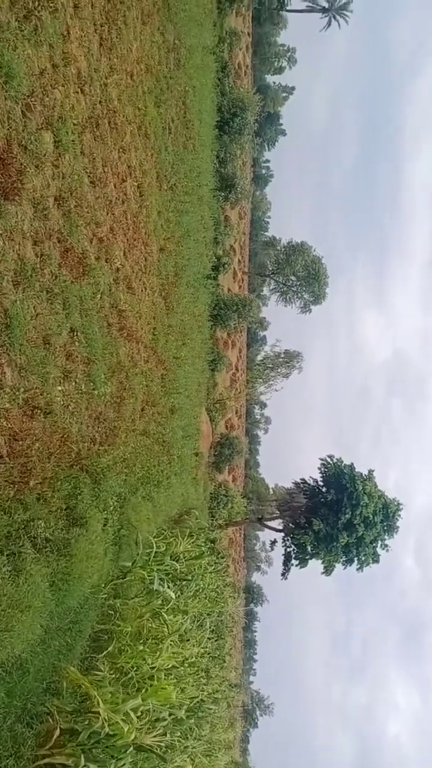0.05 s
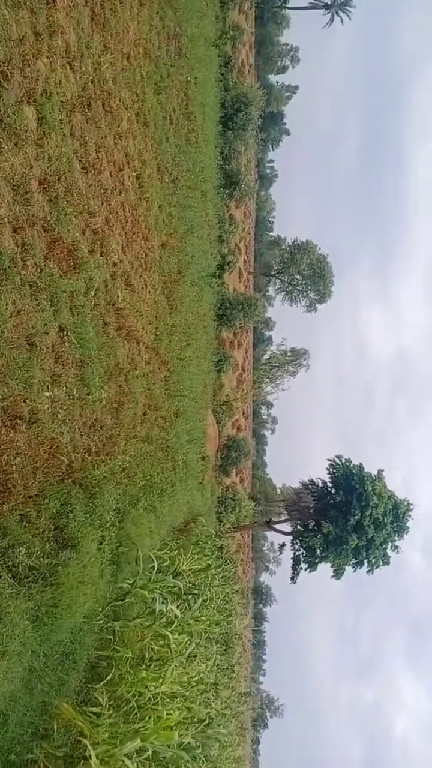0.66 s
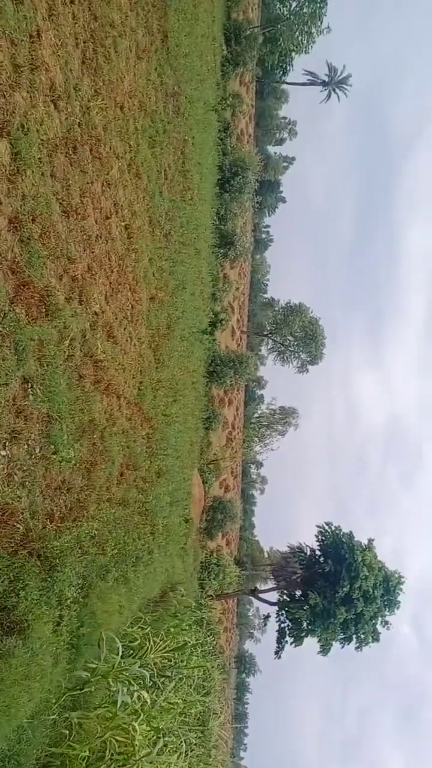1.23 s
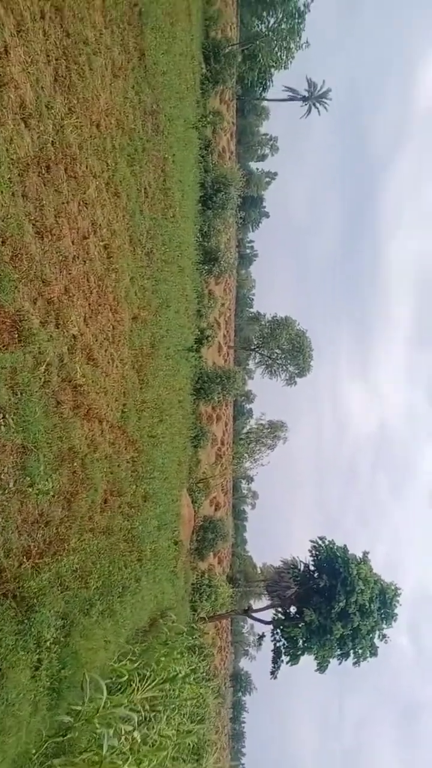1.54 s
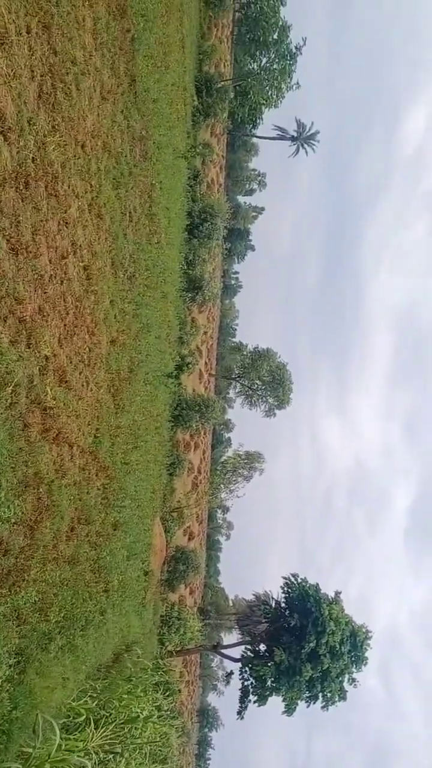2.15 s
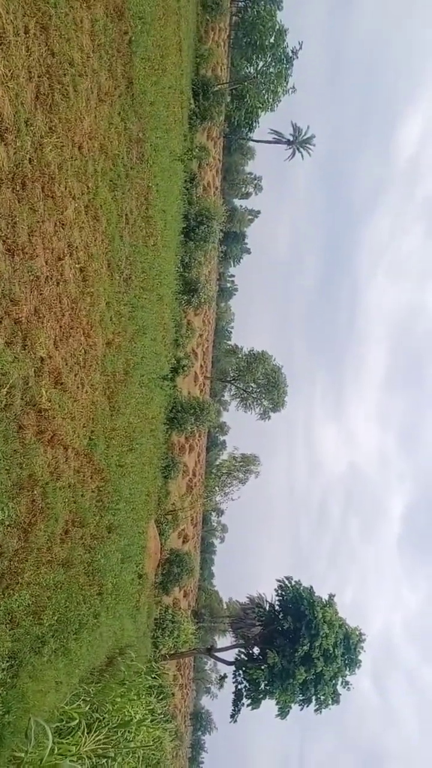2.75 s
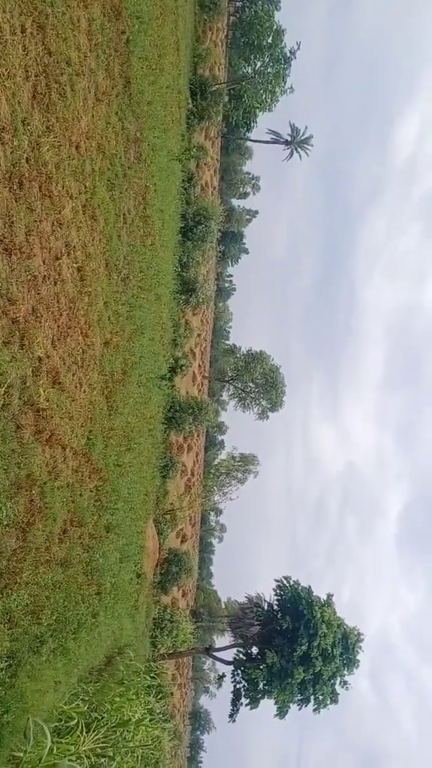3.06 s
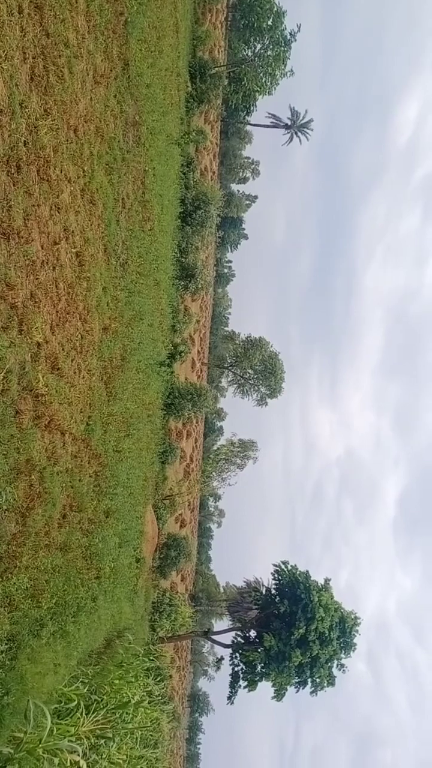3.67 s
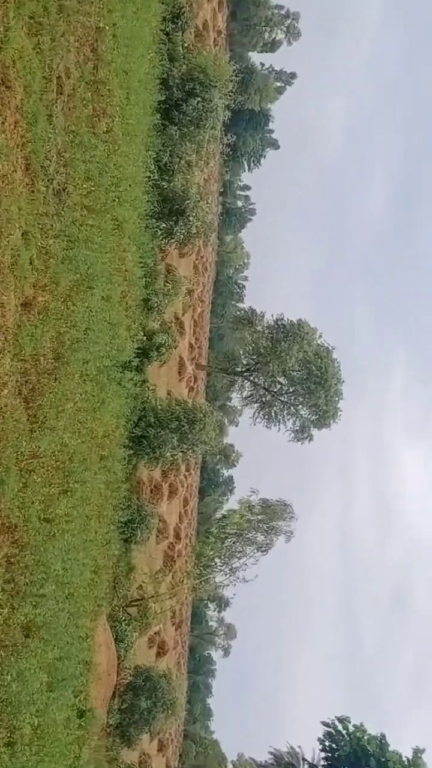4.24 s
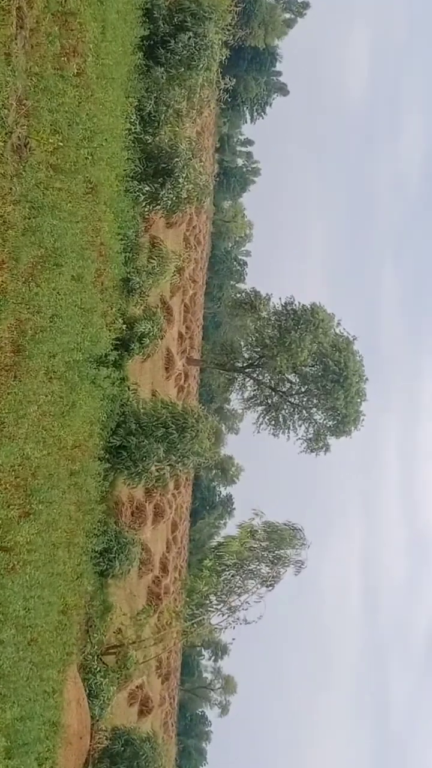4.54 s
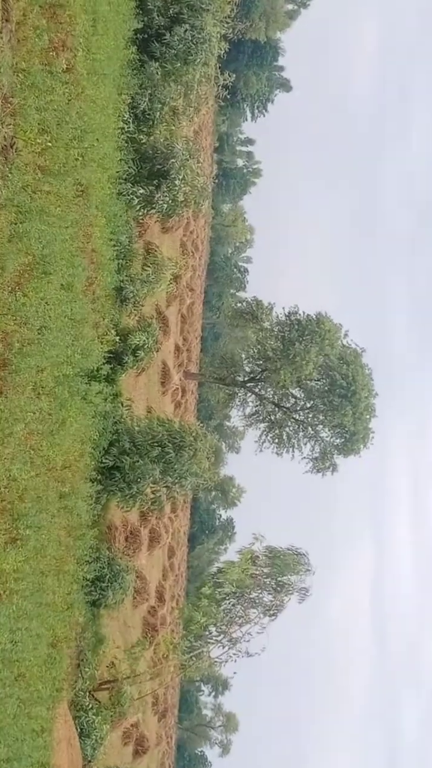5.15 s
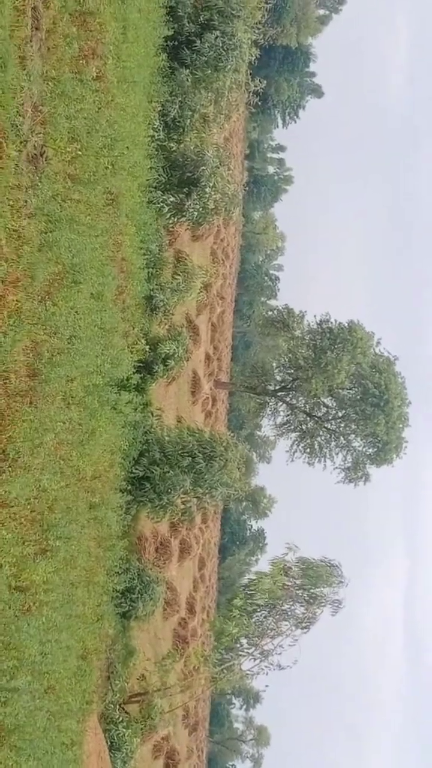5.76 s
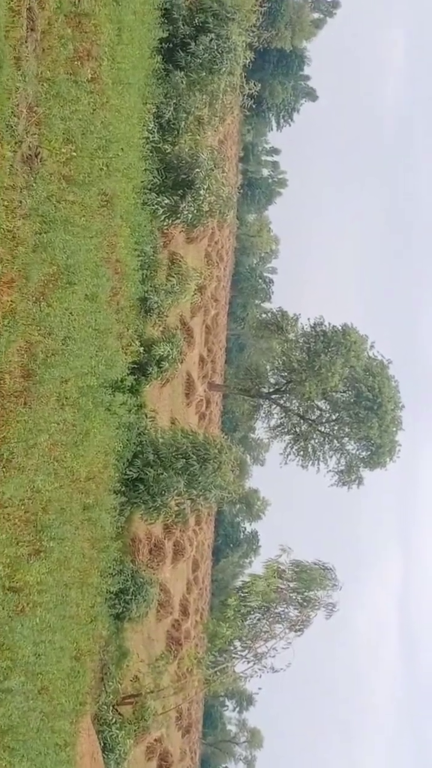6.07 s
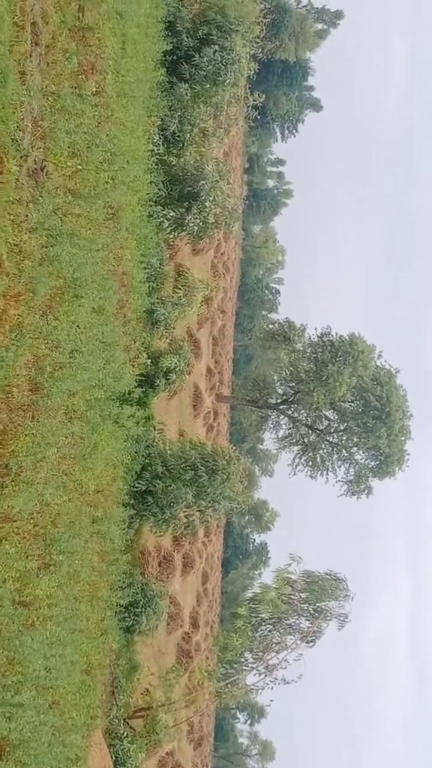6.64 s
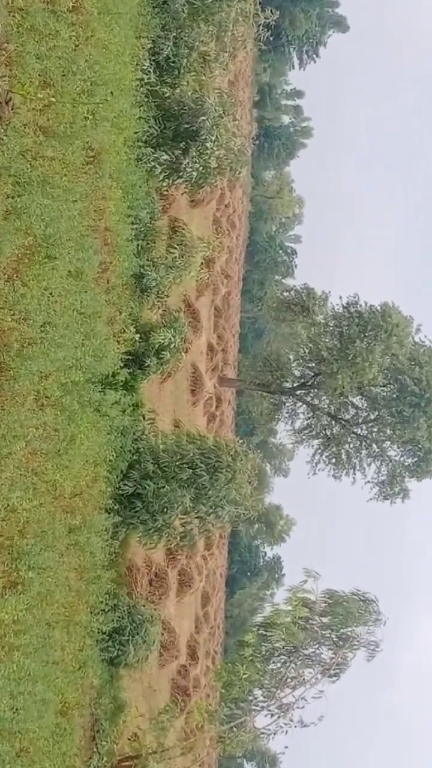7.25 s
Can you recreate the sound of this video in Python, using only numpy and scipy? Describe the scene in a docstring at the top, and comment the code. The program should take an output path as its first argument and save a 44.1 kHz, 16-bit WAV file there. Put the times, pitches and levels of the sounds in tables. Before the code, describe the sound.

Leaves brush past, then a far bird repeats a wavy whistle as songbirds grow louder over hissing field insects.

```python
"""Birds and insects on open farmland

A far bird repeats a wavy whistle, songbirds break into slides and buzzy chirps, and a dove coos.
Crickets and a katydid scrape their wings in a steady high hiss. Crop leaves brush past at first,
and puffs of wind thump on the microphone. The ground and the tree line scatter the calls."""
import sys
import numpy as np
from scipy import signal
from scipy.fft import rfft, irfft
from scipy.io import wavfile
from scipy.ndimage import uniform_filter1d, map_coordinates

SR = 44100
rng = np.random.default_rng(int(sys.argv[2]) if len(sys.argv) > 2 else 0)


def digitize_waveform(pressure):
    """Quantize a signal to 16-bit integers and store it at the path in sys.argv[1].

    Rows of a 2-D input are taken as channels; values are limited to [-1, 1].
    """
    field = np.atleast_2d(pressure).T
    bounded = np.clip(field, -1, 1)
    quanta = np.round(bounded * 32767).astype(np.int16)
    wavfile.write(sys.argv[1], SR, quanta)


N = 326340

EDGE_S, EDGE_SHARE = 0.002, 0.13  # a songbird's note fades over a fixed time plus a share of its length
BUZZ_SWING_HZ = 653  # how far the pitch swings each way in the harshest buzz


def undb(db):
    """Turn decibels into a gain to multiply by."""
    return 10 ** (np.asarray(db) / 20)


def unit(x):
    """Scale a signal so that its average strength (rms) is 1."""
    return x / np.sqrt(np.mean(x ** 2) + 1e-20)


def colour(x, points, tilt_db=0):
    """Shape the tone by (Hz, dB) points and a tilt per octave; the result has strength 1."""
    hz, db = np.transpose(points)
    octave = np.log2(np.maximum(np.fft.rfftfreq(len(x), 1 / SR), 1))
    curve_db = np.interp(octave, np.log2(hz), db) + tilt_db * octave
    return unit(irfft(rfft(x) * undb(curve_db), len(x)))


def noise(points):
    """Noise for the whole scene, shaped by (Hz, dB) points."""
    return colour(rng.standard_normal(N), points)


def walk(rate, size=N):
    """A smooth random drift, roughly between -1 and 1, with `rate` new values a second."""
    at = np.arange(size) * rate / SR
    return map_coordinates(rng.standard_normal(int(at[-1]) + 4), [at + 1], order=2, mode="nearest")


def pan(x, left_db):
    """Make stereo, with the left side louder than the right by left_db."""
    return x * undb(np.array([[left_db], [-left_db]]) / 2)


def widen(x):
    """Give a sound opposite signs left and right, which adds width to a mix."""
    return x * np.array([[1], [-1]])


def add(track, s, x):
    """Mix a sound into a track, starting at s seconds."""
    i = int(s * SR)
    x, i = x[max(-i, 0):], max(i, 0)
    track[i:i + len(x)] += x[:max(N - i, 0)]


def envelope(length, db, swell_db=0, edge=0.0053):
    """Return u, the progress through a note from 0 to 1, and a gain with fades of `edge` seconds."""
    u = np.linspace(0, 1, max(int(length * SR), 16))
    fade = np.minimum(np.minimum(u, 1 - u) * length / min(edge, length / 2), 1)
    return u, np.sin(np.pi / 2 * fade) ** 2 * undb(db + swell_db * (u - .5))


def tone(hz, overtone_db, jitter):
    """A nearly pure tone with two faint overtones; jitter is the share by which its pitch wavers."""
    phase = 2 * np.pi * np.cumsum(hz * (1 + jitter * walk(350, size=len(hz)))) / SR
    return np.sqrt(2) * sum(undb(overtone_db * np.sqrt(k - 1)) * (k * hz < SR / 2) * np.sin(k * phase)
                            for k in (1, 2, 3))


def scatter(x, db, t60, delay):
    """A shower of small echoes that starts after `delay` seconds and dies by 60 dB in t60 seconds."""
    t = np.arange(SR) / SR
    tail = unit(rng.standard_normal(SR) * np.exp(-np.log(1000) * t / t60) * (t > delay)) / np.sqrt(SR)
    return undb(db) * signal.fftconvolve(x, tail)[:N]


def outdoors(x, left_db, near_db, far_db, near_t60, far_t60):
    """The direct sound, quick echoes from ground and crops, and a thin tail from the trees."""
    echo = lambda: scatter(x, near_db, near_t60, delay=0.002) + scatter(x, far_db, far_t60, delay=0.024)
    return pan(x + echo() + widen(0.2 * echo()), left_db)


def wing_scrapes(bursts, rate, sharpness, edge):
    """The gain of a wing scraping to and fro in bursts, `rate` times a second."""
    out = np.zeros(N)
    for s, length, db, swell_db in bursts:
        u, gain = envelope(length, db, swell_db, edge)
        phase = np.pi * rate * length * u + 0.066 * walk(27, size=len(u))
        add(out, s, gain * unit(np.abs(np.sin(phase)) ** sharpness + 0.19))
    return out


def insects():
    """Ringing cricket wings and a raspy katydid (a bush cricket) over the chorus of the whole field."""
    # Bursts of scraping. Each row: start and length in seconds, relative level in dB, swell in dB.
    cricket_bursts = [(-.02, 0.19, -52, 2.5), (.58, 0.1, -51, 4), (.683, 0.19, -43, 2),
                      (2.78, 0.22, -63.5, 9), (4.2, 0.22, -62.5, 2), (4.63, 0.13, -64, 12),
                      (4.95, 0.43, -61, 3), (5.72, 0.23, -59.5, 5), (6.42, 0.22, -57, -5.5),
                      (6.9, 0.24, -55, 4.5), (7.14, 0.25, -58, -4)]
    katydid_bursts = [(2.56, .28, -65, 12), (2.82, 1.42, -62.5, 3), (5.34, 0.206, -64, 8),
                      (5.54, 1.85, -59.5, 2)]
    # The tone of the chorus and of the katydid. Each row: frequency in Hz, relative level in dB.
    chorus_colour = [(5800, -47.5), (6250, -18.5), (6550, -1.5), (6850, 1), (7150, -4), (7500, -7),
                     (8050, -6), (8350, -30.5), (8700, -39)]
    katydid_colour = [(6800, -54.5), (7300, 2), (7700, 4), (8200, 9), (8380, 3.5), (8520, -73.5),
                      (8800, -33)]
    wing = tone(hz=np.full(N, 6950.), overtone_db=-53, jitter=.012)
    cricket = wing * wing_scrapes(cricket_bursts, rate=157, sharpness=5.2, edge=0.0031)
    rasp = 0.5 * wing_scrapes(katydid_bursts, rate=55.6, sharpness=1.6, edge=0.013)
    rasp += 0.21 * wing_scrapes(katydid_bursts, rate=74, sharpness=0.64, edge=0.026)
    pulsing = 1 + 0.2 * np.sin(2 * np.pi * np.cumsum(158 + 4 * walk(8)) / SR)
    chorus = noise(chorus_colour) * pulsing * undb(-62.5 + 0.94 * walk(3.7))
    width = widen(noise(chorus_colour) * undb(-77.5))
    katydid = rasp * noise(katydid_colour) * undb(-1)
    return pan(cricket, left_db=-3.5) + pan(katydid, left_db=-12.5) + pan(chorus, left_db=-4) + width


def brushing():
    """The gains of the rustle and of its crisp hiss as leaves brush past, stroke by stroke."""
    # Leaf strokes. Each row: start and length in seconds, relative levels of rustle and hiss in dB.
    strokes = [(-.02, 0.25, -58.5, -63.5), (0.223, 0.037, -54.5, -49), (0.236, 0.067, -61, -66),
               (0.288, .14, -57.5, -55.5), (0.412, 0.051, -53.5, -49.5), (0.453, 0.19, -59.5, -54.5),
               (0.602, 0.023, -57.5, -51), (0.627, 0.496, -61, -62.5), (1.111, 0.31, -58, -59.5),
               (1.41, 0.154, -63, -68), (1.547, 0.18, -79, -81), (1.711, 0.25, -72.5, -70),
               (1.927, .1, -82, -88)]
    rustle, crisp = np.zeros(N), np.zeros(N)
    for s, length, rustle_db, crisp_db in strokes:
        add(rustle, s, envelope(length, rustle_db, swell_db=-0.5, edge=0.015)[1])
        add(crisp, s, envelope(length, crisp_db, swell_db=-0.5, edge=0.015)[1])
    return rustle, crisp


def flexing(x, depth_db, rate):
    """Leaves bend as they slide, so each third of an octave swells and fades on its own."""
    spectrum = rfft(x)
    thirds = 3 * np.log2(np.maximum(np.fft.rfftfreq(N, 1 / SR), 1) / 250)
    bands = (irfft(spectrum * np.maximum(1 - abs(thirds - k), 0), N) for k in range(16))
    return unit(sum(band * undb(depth_db * walk(rate)) for band in bands))


def leaves():
    """Countless tiny slips of leaf on leaf, with a few snapping stalks."""
    # The tone of the rustle, its crisp hiss and a snap. Each row: frequency in Hz, relative level in dB.
    leaf_colour = [(180, -48), (300, -11), (527, -11.5), (686, -66), (871, -8.5), (1190, -10), (1380, -9.5),
                   (1780, -3), (2150, 2), (2830, -2.5), (6000, -3), (7800, -16), (13200, -120)]
    crisp_colour = [(4500, -29), (6000, 11.5), (8000, 11), (10000, -5.5), (12500, -4), (15000, 2.5),
                    (16000, 7)]
    snap_colour = [(40, -100), (500, -64), (900, -2.5), (2300, 18.5), (6000, 15), (15000, -53)]
    # Stalks snapping. Each row: start and length in seconds, level in dB, brightness in dB per octave.
    stalk_snaps = [(0.174, 0.0084, -47.5, -3), (0.234, 0.016, -38.5, -6.5), (0.29, 0.016, -49, -1),
                   (0.343, 0.0037, -37, 24), (0.546, 0.0033, -43, 19), (0.549, 0.012, -47.5, -12.5),
                   (0.589, 0.011, -48.5, -11.5), (0.698, 0.0036, -37, -8), (1.047, 0.0039, -46.5, 10),
                   (1.127, 0.026, -47.5, 25), (1.505, 0.018, -52.5, 10), (1.763, 0.0037, -48, 14),
                   (1.839, 0.0068, -55.5, -11.5)]
    rustle_gain, crisp_gain = brushing()
    slips = lambda: rng.standard_normal(N) * undb(1.86 * rng.exponential(size=N) + 1.4 * walk(140))
    rustle = flexing(colour(slips(), leaf_colour), depth_db=4.5, rate=13.72) * rustle_gain * undb(4.5)
    crisp = lambda: colour(slips(), crisp_colour) * crisp_gain * undb(3.5)
    snaps = np.zeros(N)
    for s, length, db, tilt_db in stalk_snaps:
        u, gain = envelope(length, db, edge=0.0017)
        crack = colour(rng.standard_normal(2048), snap_colour, tilt_db)
        add(snaps, s, gain * unit(crack[:len(u)]))
    return pan(rustle + snaps, left_db=2) + widen(.33 * crisp()) + pan(crisp(), left_db=-3.5)


def ticks():
    """Leaf edges flick past each other with sharp, bright clicks."""
    # The tone of a click. Each row: frequency in Hz, relative level in dB.
    tick_colour = [(800, -27), (2200, -3), (7000, 7), (11000, -7), (15000, -6)]
    out = np.zeros(N)
    rustle_gain, _ = brushing()
    for when, loud in rng.random((60, 2)):
        s = 1.5 * when
        u, gain = envelope(length=.0015, db=15 * loud ** 3 - 0.5, edge=.0003)
        click = colour(rng.standard_normal(512), tick_colour)[:len(u)]
        add(out, s, rustle_gain[int(s * SR)] * gain * click)
    return pan(out, left_db=-17)


def crunches():
    """Dry stalks and leaves give way with short hollow rings, louder when the brushing is louder."""
    out = np.zeros(N)
    rustle_gain, _ = brushing()
    t = np.arange(2048) / SR
    for when, pitch, loud in rng.random((190, 3)):
        s, hz = 1.5 * when, 450 * 7.5 ** (pitch ** .7)
        db = -7.5 + 14 * loud ** 2 + 7.8 * np.log2(hz / 1500)
        ring = np.exp(-t * hz / 7) * np.sin(2 * np.pi * hz * t)
        add(out, s, rustle_gain[int(s * SR)] * undb(db) * ring)
    return pan(out + scatter(out, db=1, t60=.05, delay=.003), left_db=3)


def breeze():
    """The low murmur of open air, and puffs that thump on the microphone."""
    # Puffs of wind. Each row: start and length in seconds, level in dB.
    puffs = [(0.435, 0.084, -62.5), (1.057, 0.06, -49), (1.21, 0.28, -56.5), (3.08, 0.074, -39.5),
             (3.133, 0.068, -51), (3.241, 0.086, -50.5), (4.697, 0.18, -57.5), (6.413, 0.078, -60.5)]
    # The tone of the puffs and of the open air. Each row: frequency in Hz, relative level in dB.
    puff_colour = [(20, -24), (45, -13), (66, 8), (100, -3), (150, -10.5), (220, -33.5), (400, -86)]
    air_colour = [(20, -31), (45, -11.5), (70, 2), (110, -0.5), (160, -2.5), (220, -11.5), (320, -21),
                  (700, -25.5), (1500, -23), (3000, -29.5), (6000, -35.5), (10000, -46.5), (15000, -36)]
    gusts = np.zeros(N)
    for s, length, db in puffs:
        add(gusts, s, envelope(length, db, edge=0.015)[1])
    rumble = noise(puff_colour)
    rumble /= np.sqrt(uniform_filter1d(rumble ** 2, size=2000))  # even out its loudness
    air = noise(air_colour) + widen(0.31 * noise(air_colour))
    air *= undb(-67.5 + 1.3 * walk(4.42))
    return pan(air + gusts * rumble, left_db=3.5)


def chatter():
    """Many small birds chirp at the edge of hearing, growing louder in the second half."""
    out = np.zeros(N)
    for when, size, pitch, bend, loud in rng.random((130, 5)):
        s, hz = when * N / SR, 1900 * 2.5 ** pitch
        db = np.interp(s, [3.8, 4.3, 5.6, 6.6], [-92, -80, -75, -68]) + 10 * loud
        u, gain = envelope(.025 + .05 * size, db, edge=.015)
        add(out, s, gain * tone(hz * (1 + 0.261 * (bend - .7) * u), overtone_db=-44, jitter=.035))
    return outdoors(out, left_db=3, near_db=-2, far_db=-7, near_t60=.1, far_t60=.4)


def far_birds():
    """Faint calls swell and fade as their pitch sags a little, blurred by the trees."""
    # Far calls. Each row: start and length in seconds, starting pitch in Hz, level in dB.
    calls = [(0.921, 0.21, 1592, -66.5), (1.13, 0.17, 1549, -62.5), (1.733, 0.045, 948, -74),
             (2.005, .052, 4034, -75), (2.1, 0.053, 2795, -78), (2.068, .056, 1375, -74.5),
             (2.274, .046, 2163, -74.5), (2.409, 0.035, 1780, -73.5), (2.315, 0.066, 4414, -78),
             (3.04, .12, 1108, -73), (3.274, 0.18, 1790, -72.5), (3.528, 0.11, 885, -77),
             (3.933, 0.18, 3090, -75), (4.07, 0.046, 5950, -72), (4.14, 0.067, 4550, -79),
             (4.421, 0.17, 1888, -72), (4.629, 0.056, 4500, -66.5), (4.62, .04, 5840, -70),
             (4.78, 0.1, 2395, -70), (5.598, 0.048, 1075, -75.5), (5.93, 0.048, 937, -75),
             (6.43, 0.15, 848, -74.5), (6.821, 0.018, 1865, -56)]
    out = np.zeros(N)
    for s, length, hz, db in calls:
        u, gain = envelope(length, db, edge=length / 4)
        add(out, s, gain * tone(hz * (1 - 0.0339 * u), overtone_db=-40, jitter=0.03))
    return outdoors(out, left_db=6, near_db=5, far_db=-10.5, near_t60=0.26, far_t60=0.52)


def dove():
    """Low coos that bubble because their pitch and loudness wobble together."""
    # Coos. Each row: start and length in seconds, pitch in Hz, level in dB.
    coos = [(.95, .082, 516, -71.5), (1.26, 0.11, 506, -66.5), (2.073, .08, 574, -75.5),
            (4.132, .12, 524, -75), (4.977, 0.11, 510, -71), (5.146, 0.07, 420, -65.5),
            (5.186, .11, 556, -60), (5.291, 0.049, 569, -58), (5.358, .054, 631, -75),
            (5.43, 0.033, 560, -60), (5.517, 0.053, 577, -63.5), (5.924, .083, 519, -77),
            (6.446, 0.13, 529, -72.5), (6.82, 0.066, 581, -73)]
    out = np.zeros(N)
    for s, length, hz, db in coos:
        u, gain = envelope(length, db, edge=0.011)
        burble = np.sin(2 * np.pi * 55 * length * u)
        add(out, s, gain * (1 + 0.84 * burble) * tone(hz + 35 * burble, overtone_db=-43, jitter=0.057))
    return outdoors(out, left_db=4.5, near_db=-6, far_db=-15, near_t60=.12, far_t60=.5)


def whistler():
    """A far bird repeats one whistle that dips, rises and falls."""
    # The whistle's shape. Each row: progress from 0 to 1, base pitch in Hz, relative level in dB.
    shape = [(0, 1445, -3), (.1, 1365, -4), (.27, 1291, -6), (.47, 1378, -2), (.57, 1490, 3),
             (0.662, 1604, 0.5), (0.749, 1650, -2), (.84, 1564, 1), (.92, 1274, -7), (1, 1163, -18)]
    # Its repeats. Each row: start and length in seconds, pitch multiplier, level in dB.
    repeats = [(1.287, 0.46, 0.95, -61), (2.879, 0.42, 1.003, -57.5), (4.773, .437, 1.008, -54),
               (6.219, 0.42, 1.057, -55)]
    out = np.zeros(N)
    progress, pitch, level_db = np.transpose(shape)
    for s, length, ratio, db in repeats:
        u, gain = envelope(length, db, edge=.02)
        gain *= undb(np.interp(u, progress, level_db))
        hz = ratio * uniform_filter1d(np.interp(u, progress, pitch), size=1200)  # round the corners
        add(out, s, gain * tone(hz, overtone_db=-42.5, jitter=0.0027))
    return outdoors(out, left_db=7, near_db=-7, far_db=-17, near_t60=0.11, far_t60=0.76)


def settle(u, start, end, quickness=2.2):
    """A pitch that moves fast at first, then closes in on its end."""
    return start + (end - start) * np.expm1(-quickness * u) / np.expm1(-quickness)


def arch(u, top, end, top_at=0.27):
    """A pitch that lifts a little to its top, then falls ever faster."""
    return top + (end - top) * ((u - top_at) / (1 - top_at)) ** 2


def slide(s, length, from_hz, to_hz, db, swell_db=0, contour=settle):
    """A note that glides in pitch. Returns its start, level, sound and harshness."""
    u, gain = envelope(length, db, swell_db, edge=EDGE_S + EDGE_SHARE * length)
    flutter = undb(1.7 * walk(120, size=len(u)))
    octaves_per_s = abs(np.log2(to_hz / from_hz)) / length
    harsh = min(1, octaves_per_s / 21) ** 2
    # steep slides are the least steady; loud ones are the richest in overtones
    voice = tone(contour(u, from_hz, to_hz), -31 + 0.41 * (db + 34), jitter=0.0072 + 0.042 * harsh)
    return s, db, gain * flutter * voice, gain * harsh


def trill(s, length, from_hz, to_hz, db, rate, swing_hz, throb, swell_db=0, quickness=2.2):
    """A note whose pitch and air pressure swing together. Returns the same four things as slide."""
    u, gain = envelope(length, db, swell_db, edge=EDGE_S + EDGE_SHARE * length / 2)
    cycle = -np.cos(2 * np.pi * rate * length * u + 0.42 * walk(70, size=len(u)))
    pressure = gain * unit((1 + throb * cycle) * undb(1.1 * walk(150, size=len(u))))
    rough = swing_hz / BUZZ_SWING_HZ  # the wider the swing, the rougher the voice
    swing = swing_hz * cycle * (1 + .1 * walk(90, size=len(u)))
    hz = settle(u, from_hz, to_hz, quickness) + swing
    voice = tone(hz, overtone_db=-27 + 1.2 * (db + 39), jitter=0.0061 + 0.0372 * rough)
    return s, db, pressure * voice, 0.78 * rough * pressure


def songbirds():
    """Slides, trills and calls echo off the ground and trees; harsh notes carry a noisy rasp."""
    # Slides and trills. Each row: start and length in seconds, first and last pitch in Hz, level in dB.
    slides = [(1.33, 0.029, 2330, 2900, -54), (1.446, 0.017, 2970, 3220, -51.5),
              (1.643, .02, 3370, 3156, -40), (1.825, 0.01, 2700, 2960, -40.5),
              (4.999, 0.082, 2244, 1986, -60), (5.049, 0.034, 3060, 3350, -50),
              (5.199, .028, 3550, 3890, -42.5), (5.226, .056, 3980, 4425, -48),
              (5.308, .041, 5010, 2450, -52), (5.582, .051, 6800, 4590, -53),
              (5.806, 0.025, 3130, 2875, -48), (5.842, 0.036, 2596, 2110, -42),
              (5.878, 0.038, 2220, 1864, -55), (6.136, 0.041, 3040, 2650, -51.5),
              (6.606, 0.019, 2330, 4320, -42)]
    trills = [(1.35, 0.11, 2664, 2800, -65), (1.599, 0.054, 3750, 3630, -55),
              (1.661, .021, 3080, 3260, -51.5), (2.231, 0.093, 5950, 5750, -62),
              (5.086, 0.04, 2620, 2950, -56.5), (5.522, 0.067, 5400, 5970, -54),
              (5.638, 0.062, 2690, 2970, -52), (5.69, 0.092, 3280, 3106, -45.5),
              (5.884, 0.027, 3220, 2960, -50.5), (5.957, 0.015, 3100, 2920, -50.5)]
    # Arched notes. Each row: start and length in seconds, top and last pitch in Hz, level in dB.
    arches = [(1.841, 0.062, 2947, 2500, -42), (3.99, 0.17, 3960, 2160, -63.5),
              (4.198, 0.083, 3470, 2490, -76.5), (4.469, .12, 3340, 2600, -68),
              (4.592, 0.17, 3750, 2560, -60.5), (4.873, 0.072, 3667, 2840, -50),
              (5.061, .17, 3820, 2450, -57.5), (5.397, 0.086, 3990, 3300, -47),
              (5.92, 0.0326, 3620, 3090, -53.5), (6.825, 0.025, 3650, 2780, -38),
              (7.342, 0.021, 3320, 2950, -43)]
    # Buzzy calls. Each row: start of the whip in seconds, levels of flick, whip and buzz in dB.
    buzzy_calls = [(6.109, -50, -42.5, -51.5), (6.641, -43, -36.5, -39.5), (7.149, -44, -39.5, -37.5)]
    # Piping calls. Each row: start and held time in seconds, pitch multiplier, then in dB the held
    # note's level, its swell, the level of its octave and the level of the stutter.
    piping_calls = [(6.327, .069, 1.022, -43, 8.5, -53.5, -47.5),
                    (6.852, .058, 1.014, -32.5, 12, -60, -42.5), (7.362, 0.063, 1, -35.5, -1, -58.5, -46)]
    # The tone of the rasp. Each row: frequency in Hz, relative level in dB.
    rasp_colour = [(1200, -34), (2000, -4), (3200, 5.5), (5800, 2.5), (9000, -31.5), (11500, -31),
                   (14000, -31)]
    notes = [slide(*row, swell_db=-3.5) for row in slides] + [step_note()]
    notes += [slide(*row, swell_db=8.5, contour=arch) for row in arches]
    notes += [trill(*row, rate=89, swing_hz=304, throb=0.18) for row in trills]
    notes += [note for row in buzzy_calls for note in buzzy_call(*row)]
    notes += [note for row in piping_calls for note in piping_call(*row)]
    direct, to_trees, harshness = np.zeros((3, N))
    for s, db, note, harsh in notes:
        add(direct, s, note)
        add(harshness, s, harsh)
        # the first bird sits in the open; after 2 seconds the flock sings from the trees
        trees_db = 0 if s > 2 else -16
        add(to_trees, s, note * undb(trees_db - .3 * (db + 42.5)))  # faint notes are blurred most
    rasp = scatter(harshness * noise(rasp_colour), db=-11, t60=0.18, delay=0)
    echo = lambda: (scatter(direct, db=-8, t60=.07, delay=.003)
                    + scatter(to_trees, db=-14, t60=.5, delay=.025))
    return pan(direct + rasp + echo() + widen(0.17 * echo()), left_db=4.5)


def buzzy_call(s, flick_db, whip_db, buzz_db):
    """A short flick, then a steep whip that plunges into a harsh buzz."""
    flick_s, whip_s, buzz_s = 0.02, 0.029, 0.0874
    flick = slide(s - flick_s, flick_s, from_hz=4600, to_hz=3660, db=flick_db, swell_db=9)
    whip = slide(s, whip_s, from_hz=6240, to_hz=3620, db=whip_db, swell_db=6,
                 contour=lambda u, start, end: settle(u, start, end, quickness=1.2))
    buzz = trill(s + whip_s, buzz_s, from_hz=2774, to_hz=2620, db=buzz_db,
                 rate=111, swing_hz=BUZZ_SWING_HZ, throb=0.3)
    return [flick, whip, buzz]


def piping_call(s, held, ratio, db, swell_db, octave_db, stutter_db):
    """A held note with its octave opens between two weak side tones, then breaks into a falling stutter."""
    hz = ratio * 2925
    side_hz, side_s, sag = 642, 0.029, 0.014  # sag is the share of its pitch that each tone loses
    tones = [(hz, held, db, swell_db), (2 * hz, held, octave_db, 0),
             (hz + side_hz, side_s, db - 10.5, 0), (hz - side_hz, side_s, db - 19, 0)]
    stutter = trill(s + held - EDGE_S, length=0.1, from_hz=hz, to_hz=1977, db=stutter_db,
                    rate=75, swing_hz=100, throb=0.86, swell_db=-8.5, quickness=3.8)
    return [slide(s, length, top, top * (1 - sag), level_db, rise_db, contour=arch)
            for top, length, level_db, rise_db in tones] + [stutter]


def step_note():
    """A bright whistle that drops to a lower, purer pitch. Returns the same four things as slide."""
    # The whistle's path. Each row: time in seconds, pitch in Hz, level in dB, level of its octave in dB.
    path = [(7.044, 3345, -45.5, -56), (7.086, 3595, -41, -47), (7.1, 3556, -36, -49),
            (7.113, 2696, -43, -58), (7.134, 2584, -40.5, -77), (7.165, 2570, -43.5, -73)]
    s, hz, db, octave_db = np.transpose(path)
    u, gain = envelope(s[-1] - s[0], 0, edge=.004)
    along = lambda values: np.interp(s[0] + u * (s[-1] - s[0]), s, values)
    voice = sum(undb(along(level_db)) * tone(k * along(hz), overtone_db=-32, jitter=0.0071)
                for k, level_db in ((1, db), (2, octave_db)))
    return s[0], db.mean(), gain * voice, np.zeros(len(u))


def scene():
    """Everything heard from the edge of the field."""
    birds = whistler() + songbirds() + far_birds() + chatter() + dove()
    return birds + insects() + leaves() + ticks() + crunches() + breeze()


def record(dry):
    """The deepest bass is thinned out, and the phone cuts the highest treble."""
    bass_hz, top_hz = 42, 15800
    thinned = signal.sosfilt(signal.butter(2, bass_hz, "high", fs=SR, output="sos"), dry)
    return signal.sosfilt(signal.ellip(10, .2, 70, top_hz, fs=SR, output="sos"), thinned)


dry = scene()
out = record(dry)
digitize_waveform(out)
```